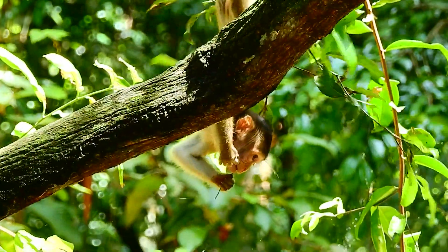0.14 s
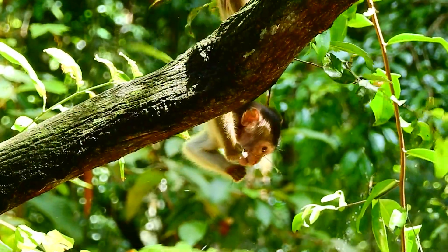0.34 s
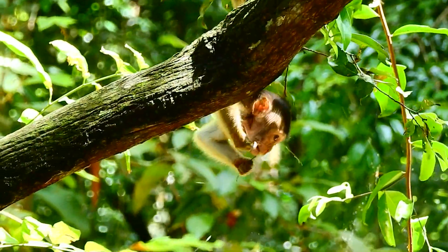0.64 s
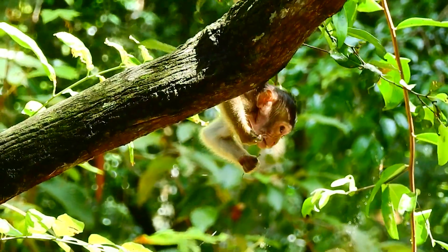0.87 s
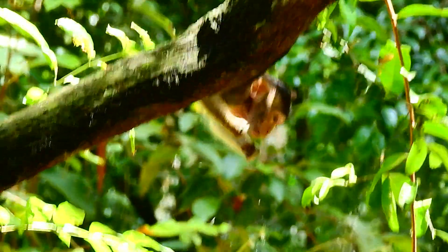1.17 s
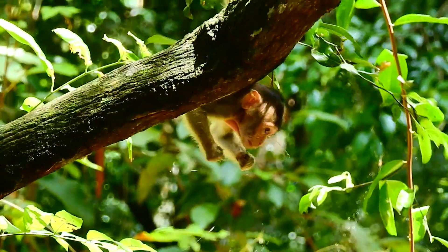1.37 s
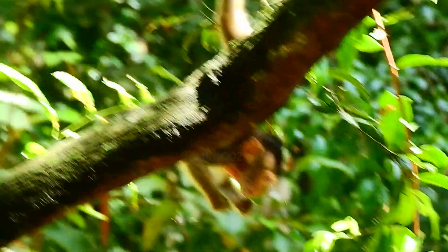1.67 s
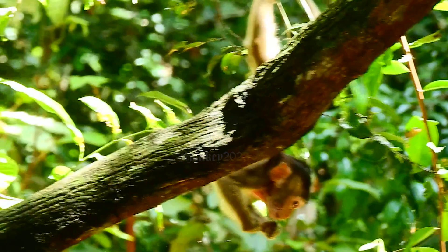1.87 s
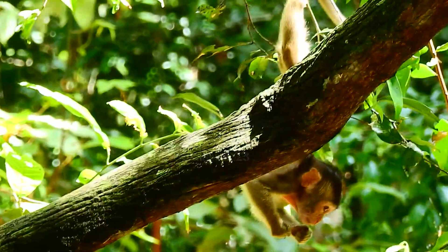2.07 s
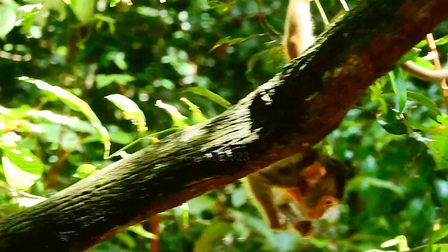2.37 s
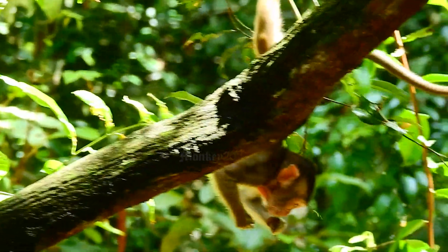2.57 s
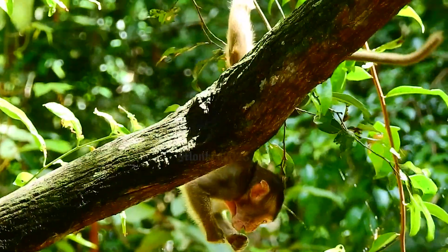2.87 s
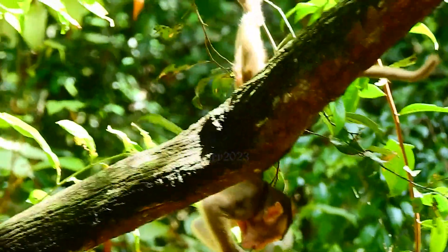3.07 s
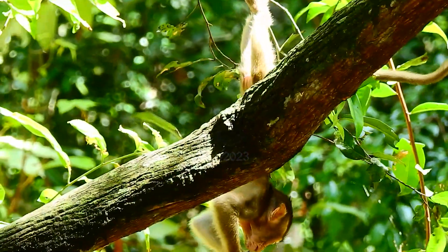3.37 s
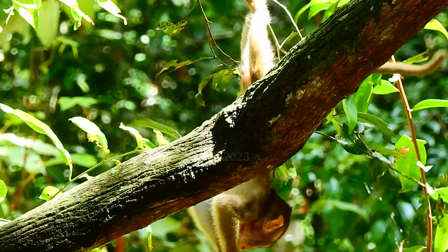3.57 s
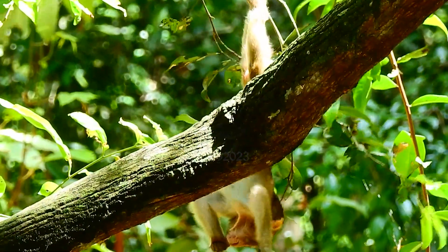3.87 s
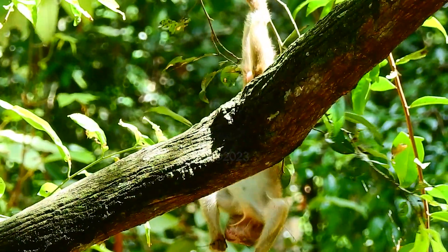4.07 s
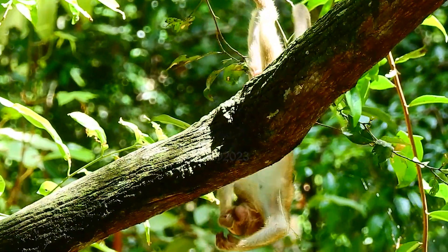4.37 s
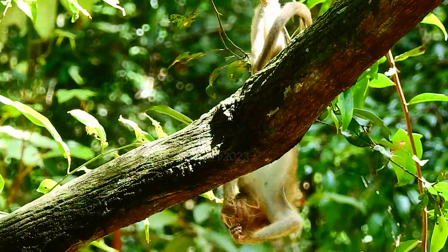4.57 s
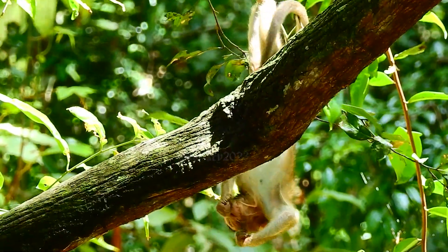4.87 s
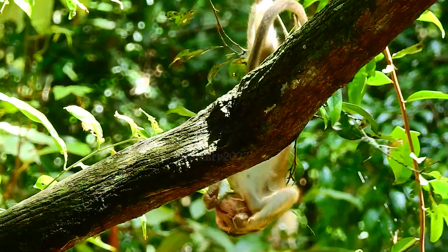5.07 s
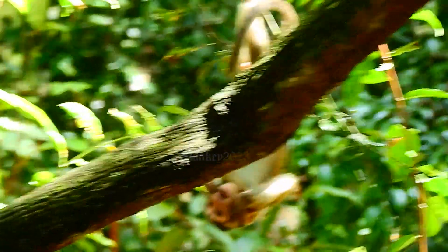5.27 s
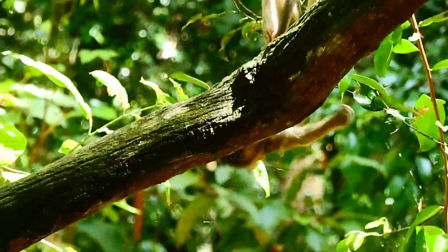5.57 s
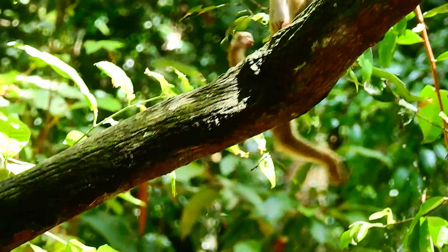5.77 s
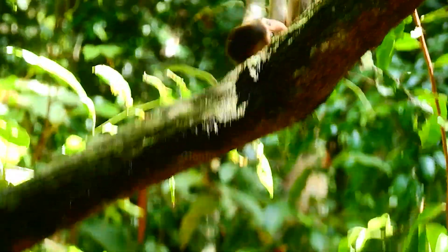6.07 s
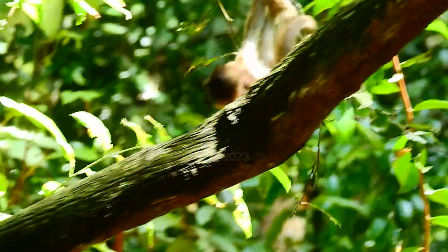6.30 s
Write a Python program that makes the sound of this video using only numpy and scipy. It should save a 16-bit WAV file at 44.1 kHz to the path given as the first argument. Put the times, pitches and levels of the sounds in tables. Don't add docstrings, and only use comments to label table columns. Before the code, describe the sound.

Forest-edge daytime ambience: faint thin bird chirps with woodland echo, a pulsing cricket, occasional twig ticks, soft hiss and deep far-off rumble.

```python
import sys
import numpy as np
from scipy import signal
from scipy.io import wavfile
from scipy.ndimage import uniform_filter1d

SR = 44100
rng = np.random.default_rng(int(sys.argv[2]) if len(sys.argv) > 2 else 0)


def store_pcm(level_fs):
    pcm = np.round(np.clip(level_fs, -1, 1) * 32767).astype(np.int16)
    wavfile.write(sys.argv[1], SR, np.atleast_2d(pcm).T)


def ratio(d):
    e = np.asarray(d, float) / 20
    return 10 ** e


N = 284004


def evened(x):
    return x / np.sqrt(np.mean(abs(x) ** 2) + 1e-20)


def read(points, hz):
    f, value = np.transpose(points)
    return np.interp(np.log(hz + 1), np.log(f + 1), value)


def add(mix, s, sound):
    part = mix[..., round(s * SR):][..., :sound.shape[-1]]
    part += sound[..., :part.shape[-1]]


def wobble(count, width_hz):
    r = np.exp(-np.pi * width_hz / SR)
    z = rng.standard_normal((count + 2000, 2)) @ [1, 1j]
    settled = signal.lfilter([1], [1, -2 * r, r * r], z)[2000:]
    return evened(settled)


PORTS_HZ = 4600


def ports(wave, hz, bearing):
    lead = bearing * (hz / PORTS_HZ) ** 2
    left = wave * np.exp(.5j * lead)
    right = wave * np.exp(-.5j * lead)
    return np.array([left, right]).real


def note(row, db, bearing, blur, blur_hz, octave_db):
    start, end, start_hz, end_hz = row
    count = round((end - start + .006) * SR)
    blur = np.clip(blur, .3, 1)
    waver_hz = .2 * blur_hz * wobble(count, 60).real
    hz = np.linspace(start_hz, end_hz, count) + waver_hz
    turn = np.exp(2j * np.pi * np.cumsum(hz) / SR)
    level = np.sqrt(2) * ratio(db) * signal.windows.tukey(count, .014 * SR / count)
    level = level * (np.sqrt(1 - blur ** 2) + blur * wobble(count, 1.7 * blur_hz))
    sound = ports(level * turn, hz, bearing)
    if octave_db is not None:
        sound += ratio(octave_db + 1.0 * (db + 28.5)) * ports(level * turn ** 2, 2 * hz, bearing)
    return sound


HELD_SAG_HZ_PER_S = 250
HOOK_S, HOOK_HZ, HOOK_DB = .025, 180, -4


def held(rows, hook=True):
    s, _, hz, db = rows[0]
    first = [(s - HOOK_S, s, hz + HOOK_HZ, hz, db + HOOK_DB)] if hook else []
    return first + [(s, s + d, hz, hz - HELD_SAG_HZ_PER_S * d, db) for s, d, hz, db in rows]


def slurs(rows):
    return [(s, s + d, hz, hz + slide, db) for s, d, hz, slide, db in rows]


# start in seconds, length in seconds, pitch in Hz, level in dB.
WHISTLE_NOTES = [
    (1.205, .095, 6170, -34),
    (1.31, .04, 6320, -31),
    (1.345, .11, 6320, -28),
    (1.45, .07, 6310, -33),
]


def whistler():
    return held(WHISTLE_NOTES)


# start in seconds, length in seconds, pitch in Hz, level in dB.
TRILL_OPENING_NOTES = [(2.255, .075, 6930, -34.5)]
TRILL_S, TRILL_STEP_S, TRILL_NOTE_S = 2.372, .11, .044
TRILL_HZ, TRILL_STEP_HZ, TRILL_DROOP_HZ = 6740, 33, 120
TRILL_DB, TRILL_CREST, TRILL_FADE_DB = -30.5, 1, 0.3


def triller(count=5):
    k = np.arange(count)
    s = TRILL_S + TRILL_STEP_S * k
    hz = TRILL_HZ - TRILL_STEP_HZ * k
    db = TRILL_DB - TRILL_FADE_DB * (k - TRILL_CREST) ** 2
    return held(TRILL_OPENING_NOTES) + list(zip(s, s + TRILL_NOTE_S, hz, hz - TRILL_DROOP_HZ, db))


# start in seconds, length in seconds, pitch in Hz, slide in Hz, level in dB.
CHATTER_NOTES = [
    (5.355, .03, 6330, -130, -37),
    (5.412, .04, 7000, -400, -37),
    (5.412, .043, 6350, -170, -35),
    (5.475, .085, 6800, -170, -33.5),
    (5.49, .11, 6300, 150, -38.5),
    (5.56, .1, 6780, -130, -38),
]


def chatterer():
    return slurs(CHATTER_NOTES)


# start in seconds, length in seconds, pitch in Hz, level in dB.
DISTANT_NOTES = [
    (4.29, .1, 6130, -44),
    (4.41, .05, 6110, -47),
    (2.46, .1, 4180, -50),
]


def far_bird():
    return held(DISTANT_NOTES, hook=False)


# start in seconds, length in seconds, level in dB.
LOW_BIRD_PULSES = [
    (1.62, .1, -41),
    (1.735, .065, -44),
    (1.81, .09, -40),
    (1.915, .075, -42),
    (2.02, .135, -44),
    (2.26, .04, -47),
]
LOW_HZ, LOW_RISE_HZ_PER_S = 3225, 100
LOW_SCOOP_S, LOW_SCOOP_HZ, LOW_SCOOP_DB = .035, 270, -5


def low_bird():
    first, _, first_db = LOW_BIRD_PULSES[0]

    def pitch(t):
        return LOW_HZ + LOW_RISE_HZ_PER_S * (t - first)
    scoop = (first - LOW_SCOOP_S, first, LOW_HZ - LOW_SCOOP_HZ, LOW_HZ, first_db + LOW_SCOOP_DB)
    return [scoop] + [(s, s + d, pitch(s), pitch(s + d), db) for s, d, db in LOW_BIRD_PULSES]


# start in seconds, crest in seconds, end in seconds, crest pitch in Hz.
WARBLE_ARCHES = [
    (2.34, 2.69, 2.86, 3220),
    (5.66, 5.83, 6.18, 3450),
]
# start in seconds, length in seconds, level in dB.
WARBLE_SYLLABLES = [(2.45, .05, -38.5), (2.5, .05, -42), (2.57, .05, -47), (2.64, .06, -41),
                    (2.72, .05, -40), (2.78, .04, -42), (2.83, .04, -45), (5.68, .06, -54),
                    (5.75, .05, -41), (5.8, .03, -38), (5.9, .08, -45), (6.005, .03, -38),
                    (6.07, .045, -39.5), (6.15, .04, -41)]
ARCH_FOOT_HZ, ARCH_BEND = 2560, 1.7


def warbler():
    def pitch(t):
        start, crest, end, hz = min(WARBLE_ARCHES, key=lambda arch: abs(arch[1] - t))
        side = start if t < crest else end
        return hz - (hz - ARCH_FOOT_HZ) * abs((t - crest) / (side - crest)) ** ARCH_BEND
    return [(s, s + d, pitch(s), pitch(s + d), db) for s, d, db in WARBLE_SYLLABLES]


# start in seconds, length in seconds, pitch in Hz, slide in Hz, level in dB.
SLIDE_NOTES = [
    (2.945, .052, 7260, -400, -35),
    (2.997, .028, 6800, -20, -24.5),
    (3.06, .052, 7400, -150, -33),
]


def slider():
    return slurs(SLIDE_NOTES)


# start in seconds, length in seconds, pitch in Hz, slide in Hz, level in dB.
PIPE_NOTES = [
    (3.02, .014, 3980, -20, -37),
    (3.034, .026, 3960, 70, -27.5),
    (3.056, .03, 4100, 30, -31),
    (3.062, .065, 3990, 0, -37),
]
PIPE_OCTAVE_DB = -4


def piper():
    return slurs(PIPE_NOTES)


# start in seconds, length in seconds, pitch in Hz, slide in Hz, level in dB.
RASP_NOTES = [
    (3.055, .07, 7500, -400, -40),
    (3.05, .05, 8500, -200, -48),
]


def rasper():
    return slurs(RASP_NOTES)


# start in seconds, pitch in Hz, level in dB.
PIP_NOTES = [
    (3.274, 5795, -35.5),
    (5.687, 5770, -35.5),
]
PIP_S, PIP_DROOP_HZ, PIP_LINGER_S, PIP_LINGER_DB = .03, 40, .23, -9


def pipper():
    starts = [(s, s + PIP_S, hz, hz - PIP_DROOP_HZ, db) for s, hz, db in PIP_NOTES]
    holds = [(end, end + PIP_LINGER_S, low, low - PIP_DROOP_HZ / 2, db + PIP_LINGER_DB)
             for _, end, _, low, db in starts]
    return starts + holds


BIRD_PLACES = {"whistler": (-.75, .94, 128, -2, .1), "chatterer": (-.81, .7, 320, -1.5, .1),
               "far": (-.77, .75, 81, -.5, .1), "rasper": (.67, .99, 640, 4, .1),
               "triller": (-.74, .7, 100, -1, 0), "low": (-1.2, .72, 65, -5, -1.5),
               "warbler": (-1.2, .62, 110, -1, -.5), "slider": (.78, .45, 90, -2, 0),
               "piper": (.57, .3, 56, -2.5, 0), "pipper": (-.32, .45, 50, -5, -.5)}


def birds():
    direct, sent = np.zeros((2, N)), np.zeros((2, N))
    songs = {"whistler": whistler(), "triller": triller(), "chatterer": chatterer(), "far": far_bird(),
             "low": low_bird(), "warbler": warbler(), "slider": slider(), "piper": piper(),
             "pipper": pipper(), "rasper": rasper()}
    for name, notes in songs.items():
        bearing, blur, blur_hz, echo_db, near_db = BIRD_PLACES[name]
        octave_db = PIPE_OCTAVE_DB if name == "piper" else None
        for *row, db in notes:
            sound = ratio(near_db) * note(row, db, bearing, blur, blur_hz, octave_db)
            add(direct, row[0], sound)
            add(sent, row[0], ratio(echo_db) * sound)
    return direct, sent


THROB_S, THROB_STEP_S = .08, .1969
THROB_DRIFT_S, DRIFT_STEP_S, LATEST_S = .013, 5.5, .6
CRICKET_DB, CRICKET_FADE_DB_PER_S = -37.5, 0.16


def cricket(wing_hz=4700, strokes_hz=66, rise=.02, fall=.05):
    t, effort = np.arange(9000) / SR, np.zeros(N)
    throb = (1 - np.exp(-t / rise)) * np.exp(-t / fall) * 3.5
    even = np.arange(THROB_S, N / SR, THROB_STEP_S)
    starts = even + THROB_DRIFT_S * np.cos(2 * np.pi * (even - LATEST_S) / DRIFT_STEP_S)
    for s, chance in zip(starts, rng.standard_normal(len(starts))):
        add(effort, s, ratio(1.2 * chance) * throb)
    t = np.arange(N) / SR
    effort *= ratio(CRICKET_DB - CRICKET_FADE_DB_PER_S * t)
    strokes = 1 + .22 * np.cos(2 * np.pi * strokes_hz * t)
    tone = wobble(N, 460) * np.exp(2j * np.pi * wing_hz * t)
    return ports(effort * strokes * tone, wing_hz, -0.92)


def tick(hz, bearing, ring=.003):
    u = np.arange(1200) / SR / ring
    wave = np.e * u * np.exp(-u + 2j * np.pi * hz * u * ring)
    return ports(wave * wobble(len(u), hz ** 3 / 1.3e8), hz, bearing)


# start in seconds, peak level in dB, ring in Hz, bearing from -1 right to 1 left.
TWIG_TICKS = [
    (1.645, -41, 5300, -.6),
    (1.805, -35, 3550, -.6),
    (1.805, -41, 5600, -.6),
    (2.095, -36, 6600, -.95),
    (3.118, -31, 6600, .63),
    (4.575, -41, 5700, -.6),
]


def twigs():
    mix = np.zeros((2, N))
    for s, db, hz, bearing in TWIG_TICKS:
        add(mix, s, ratio(db) * tick(hz, bearing))
    return mix


# frequency in Hz, time to fall by 60 dB in seconds.
WOODS_DECAY = [(3000, 1.3), (6000, 1.2), (8500, 1.1)]


def trees(x, own=0.31):
    taps = np.zeros((3, SR))
    at = np.arange(500, SR - 20, 20) + rng.integers(0, 20, (3, (SR - 501) // 20))
    np.put_along_axis(taps, at, rng.choice([-1., 1.], at.shape), 1)
    hz, t, z = signal.stft(taps[2] + own * taps[:2], SR, nperseg=256)
    decay = ratio(-60 * t / read(WOODS_DECAY, hz)[:, None])
    tail = signal.istft(z * decay, SR, nperseg=256)[1]
    return signal.fftconvolve(x, tail / np.linalg.norm(tail[0]), axes=1)[:, :N]


def together(*dbs):
    return 10 * np.log10(sum(10 ** (db / 10) for db in dbs))


def bump_db(hz, centre_hz, width_hz):
    return -20 * np.log10(1 + (2 * (hz - centre_hz) / width_hz) ** 2)


# frequency in Hz, left-right likeness from 0 to 1.
PORT_LIKENESS = [(60, .996), (200, .995), (350, .984), (700, .955), (1400, .9), (2800, .78), (4700, .45),
                 (6500, .3), (9000, .2), (15000, .05)]
# frequency in Hz, lead in radians.
PORT_LEAD = [(0, 0), (2000, 0), (3900, -.1), (4700, -.6), (6000, -.3), (7500, .5), (9500, 1.4), (15000, .4)]
# frequency in Hz, left minus right in dB.
PORT_TILT = [(60, -.5), (1400, -.2), (4000, -.8), (9000, -.9), (14000, -.1)]


def diffuse(field_db, size):
    frames, hz = N * 4 // size + 5, np.fft.rfftfreq(size, 1 / SR)
    a, b, c, d, patches = rng.standard_normal((frames, len(hz), 5)).T
    patches = evened(uniform_filter1d(uniform_filter1d(patches, 9, 0), 14, 1))
    patch_db = np.interp(hz, [1500, 4000], [1.8, .6])[:, None] * patches
    same = (np.clip(read(PORT_LIKENESS, hz), 0, 1) * np.exp(-1j * read(PORT_LEAD, hz)))[:, None]
    tilt = ratio(read(PORT_TILT, hz) / 2)[:, None]
    left = a + 1j * b
    right = same * left + np.sqrt(1 - abs(same) ** 2) * (c + 1j * d)
    z = np.array([left * tilt, right / tilt])
    z *= ratio(field_db(hz[:, None], np.arange(frames) * size / 4 / SR) + patch_db)
    return evened(signal.istft(z, nperseg=size, noverlap=size * 3 // 4)[1][:, :N])


# frequency in Hz, level in dB per Hz.
LEAF_HISS = [(180, 9.5), (300, -1), (492, -1.5), (708, -1), (795, -6.5), (1090, -5.5), (1810, -7),
             (2180, -7), (2570, -9.5), (3690, -12), (4650, 1.5), (5580, -4), (6690, -4), (9010, -24),
             (15500, -45)]
# frequency in Hz, width in Hz, level in dB beside the leaves.
FROG_CHORUS = [
    (807, 70, 3.5),
    (2158, 340, -4.5),
]
# time in seconds, gust strength in dB.
BREEZE_GUSTS = [(0, 2.5), (.4, 0.95), (2, 1.24), (4.4, 2.02), (4.9, 2.5), (5.6, 2.47), (6.44, 3)]
LEAVES_DB, CALM_DB, HIGH_PER_GUST = -32.5, 0.8, 2.46
INSECTS_DB, INSECTS_PER_GUST = -26.5, 9.4


def leaves():
    rates = np.geomspace(.5, 5, 12)[:, None]
    phases = rng.random((len(FROG_CHORUS), 12, 1))

    def field_db(hz, t):
        high = np.clip(np.log2(hz / 5000 + 1e-9), 0, 1)
        gust = np.interp(t, *np.transpose(BREEZE_GUSTS))
        swell = (1 - high) * gust + high * (HIGH_PER_GUST * (gust - CALM_DB) - 1)
        flicker = evened(np.sin(2 * np.pi * (rates * t + phases)).sum(1))
        frogs = [bump_db(hz, f, w) + db + 1.5 * wave for (f, w, db), wave in zip(FROG_CHORUS, flicker)]
        insects = bump_db(hz, 3490, 1000) + INSECTS_DB + INSECTS_PER_GUST * (gust - CALM_DB)
        return together(read(LEAF_HISS, hz), insects, *frogs) + swell
    return ratio(LEAVES_DB) * diffuse(field_db, size=1024)


# frequency in Hz, level in dB per Hz.
ROAD_ROAR = [(13, -72), (22, -32), (38, -32.5), (64, -10.5), (81, 2), (130, -0.5), (175, -17.5),
             (198, -14.5), (216, -26), (420, -25), (550, -50), (920, -120)]
# time in seconds, effort in dB.
ENGINE_EFFORT = [(0, -3), (1.8, -0.5), (2.6, 3), (4.1, 2), (6.44, 3)]
TRAFFIC_DB = -26.5
OCTAVE_DB, OCTAVE_RISE_DB_PER_S = -23, 2
ROAD_SWELL_DB, ROAD_SWELL_S, ROAD_LULL_S = 1.5, 4.5, 2.58


def traffic():
    def field_db(hz, t):
        drone = bump_db(hz, 151.5, 57.0) + np.interp(t, *np.transpose(ENGINE_EFFORT))
        octave = bump_db(hz, 270.6, 110) + OCTAVE_DB + OCTAVE_RISE_DB_PER_S * t
        wave = -ROAD_SWELL_DB * np.cos(2 * np.pi * (t - ROAD_LULL_S) / ROAD_SWELL_S)
        return together(read(ROAD_ROAR, hz) + wave, drone, octave)
    return ratio(TRAFFIC_DB) * diffuse(field_db, size=2048)


def scene():
    songs, sent = birds()
    throbs = cricket()
    direct = songs + throbs + twigs()
    echoes = trees(sent + ratio(-1.5) * throbs)
    top_cut = signal.butter(4, 9300, fs=SR, output="sos")
    return signal.sosfilt(top_cut, direct + echoes) + leaves() + traffic()


def band_limit(x):
    return signal.sosfilt(signal.butter(12, 15680, fs=SR, output="sos"), x)


def record(dry):
    low_cut = signal.butter(4, 40, "high", fs=SR, output="sos")
    fade_in = np.minimum(np.arange(N) / 220, 1)
    mix = signal.sosfilt(low_cut, dry * fade_in)
    return band_limit(mix)


dry = scene()
out = record(dry)
store_pcm(out)
```